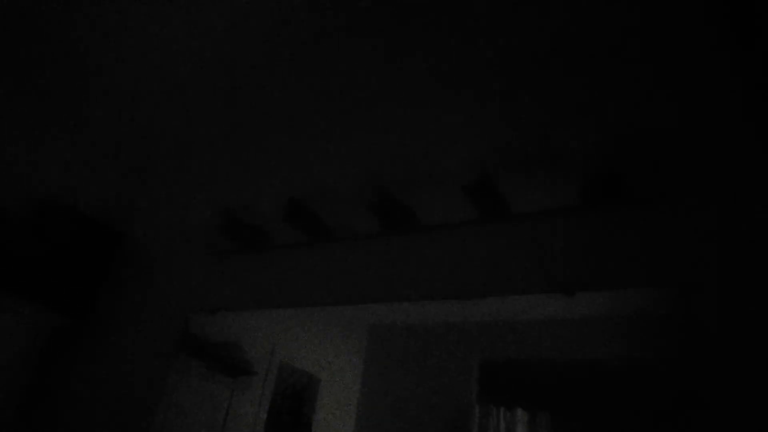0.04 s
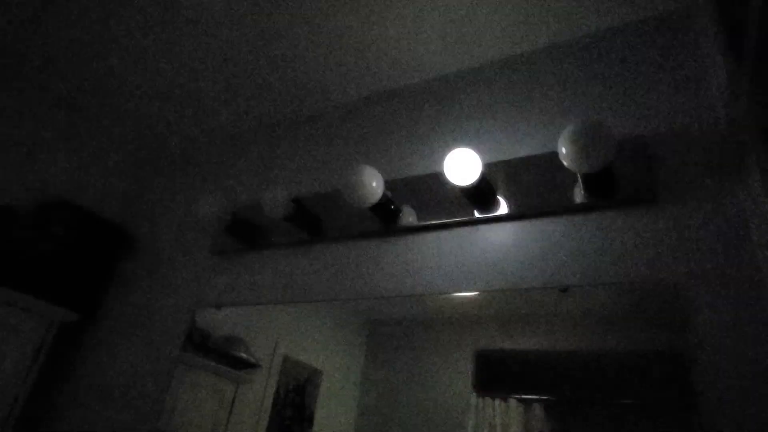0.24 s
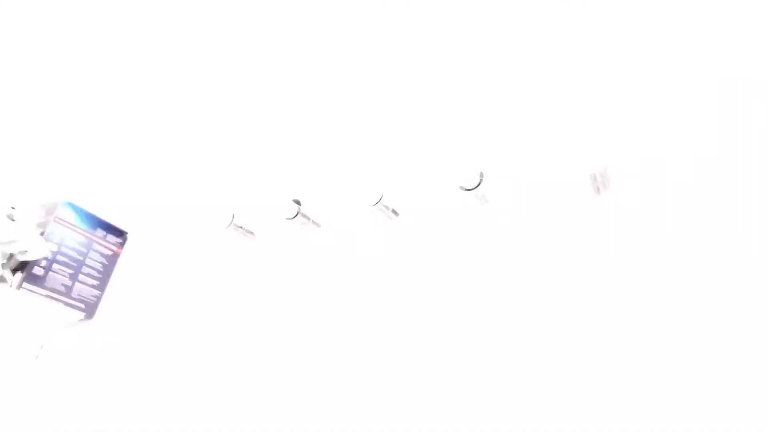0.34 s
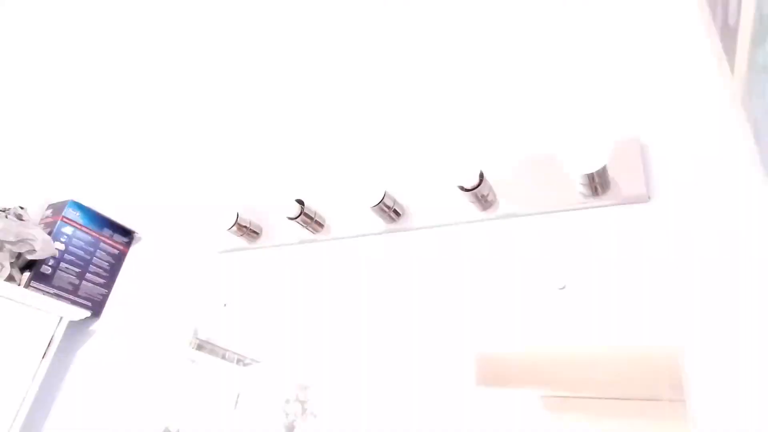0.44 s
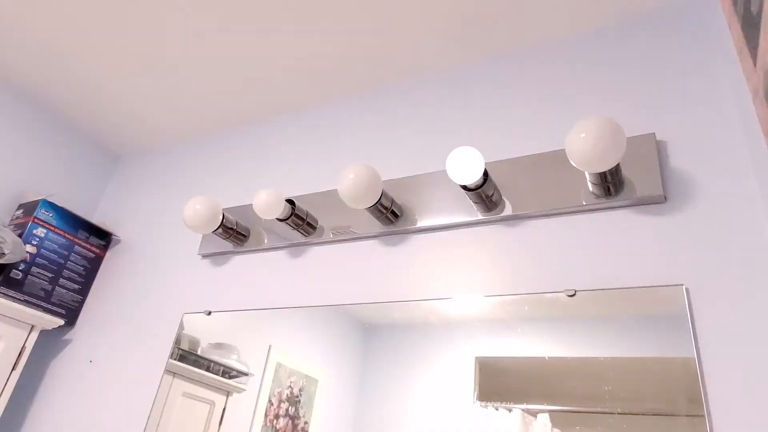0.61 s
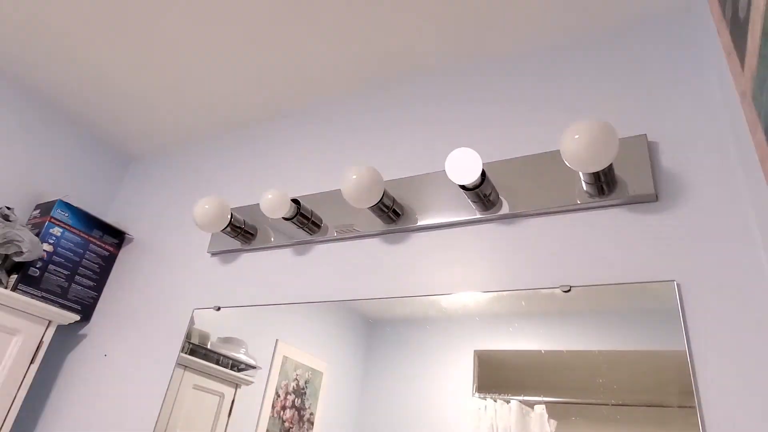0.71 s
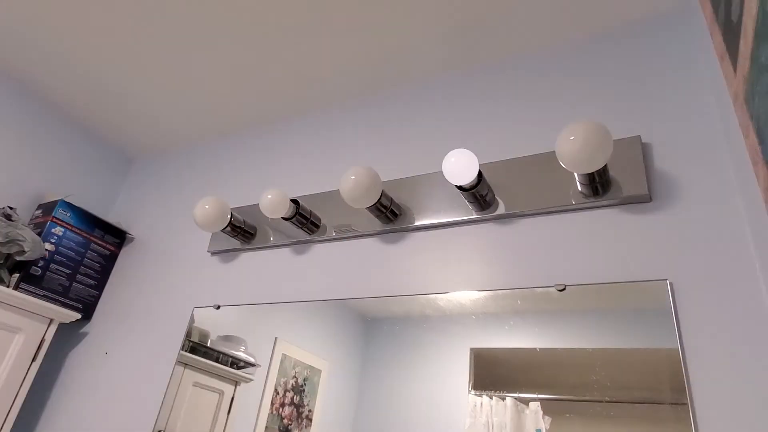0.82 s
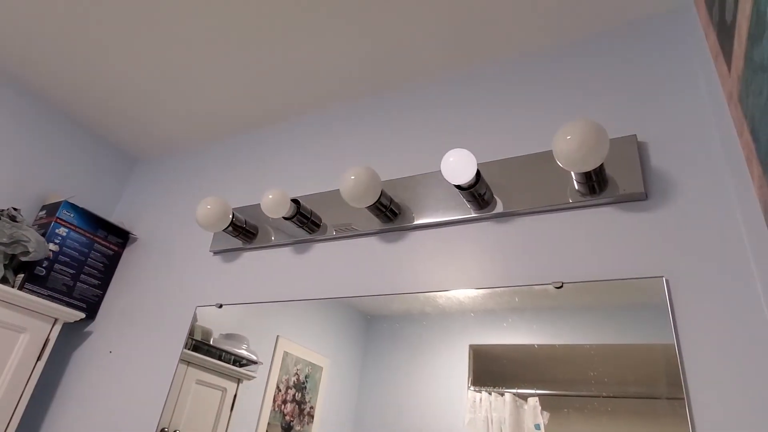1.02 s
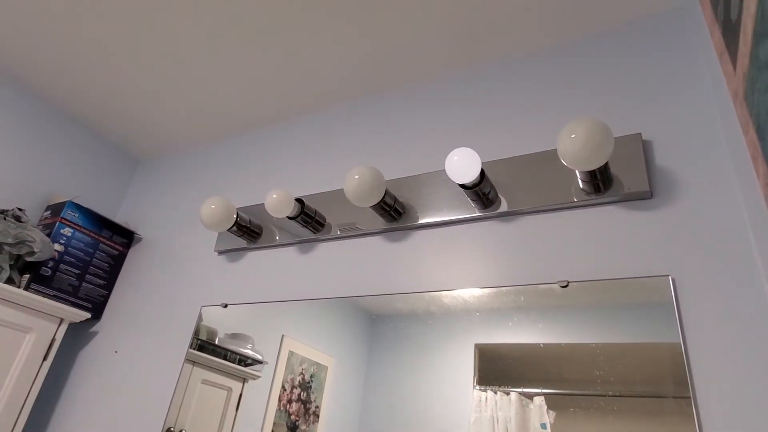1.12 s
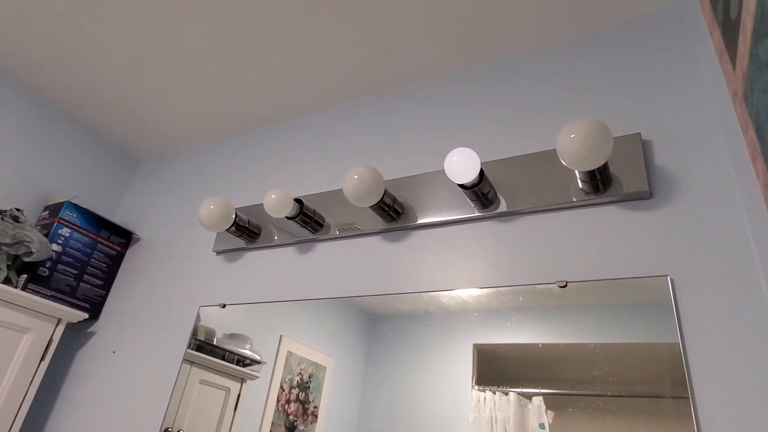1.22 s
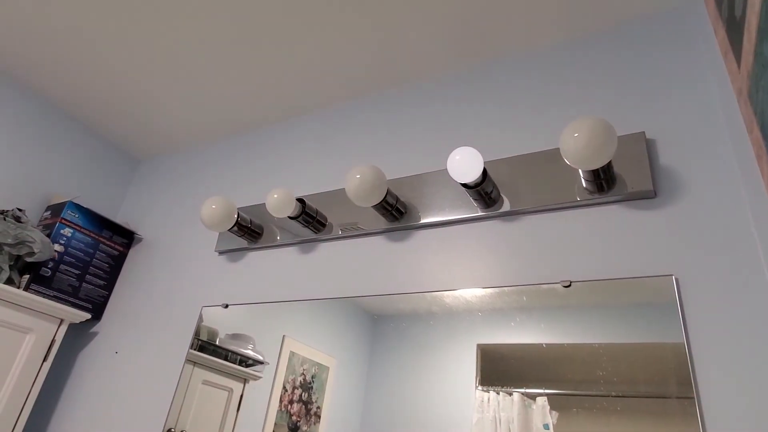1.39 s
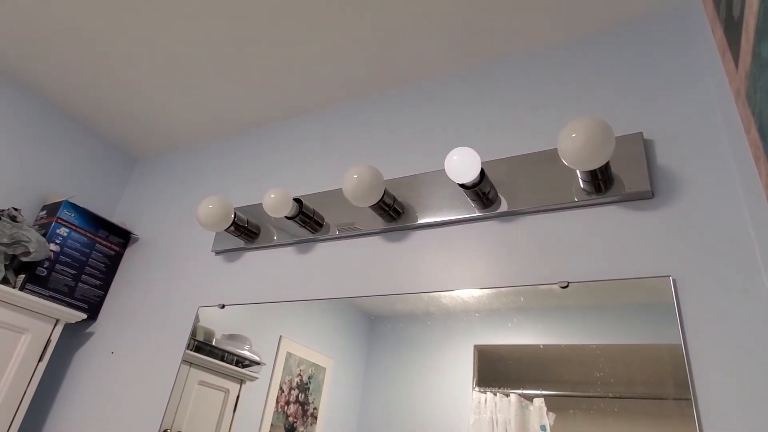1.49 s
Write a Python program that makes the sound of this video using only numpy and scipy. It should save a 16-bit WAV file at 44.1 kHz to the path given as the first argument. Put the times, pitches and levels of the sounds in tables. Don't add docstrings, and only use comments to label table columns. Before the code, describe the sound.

Single crisp light switch click with a hollow wall thump and short bathroom echo, over faint hum.

```python
import sys
import numpy as np
from scipy import signal
from scipy.fft import rfft, irfft
from scipy.io import wavfile

SR = 44100
rng = np.random.default_rng(int(sys.argv[2]) if len(sys.argv) > 2 else 0)


def voltage_ratio(level):
    return 10 ** (np.asarray(level, float) / 20)


def file_out(sig):
    cols = np.atleast_2d(sig).T
    lim = np.clip(cols, -1, 1)
    pcm = np.round(lim * 32767).astype(np.int16)
    wavfile.write(sys.argv[1], SR, pcm)


N = 68355
SNAP_S, SNAP_DB = .2361, -26


def evened(x):
    return x / np.sqrt(np.mean(x ** 2) + 1e-20)


def read(points, hz):
    f, value = np.transpose(points)
    return np.interp(np.log(hz + 1), np.log(f + 1), value)


def coloured(x, points):
    hz = np.fft.rfftfreq(x.shape[-1], 1 / SR)
    return irfft(rfft(x) * voltage_ratio(read(points, hz)), x.shape[-1])


def spread(pair, same, lean_db):
    right = same * pair[0] + np.sqrt(1 - same ** 2) * pair[1]
    return np.array([pair[0] * voltage_ratio(lean_db / 2), right * voltage_ratio(-lean_db / 2)])


def ring(start, db, modes, strikes=((0, 0),)):
    out = np.zeros((2, N))
    for delay, strike_db in strikes:
        t = np.maximum(np.arange(N) / SR - start - delay, 0)
        for hz, left_db, right_db, t60 in modes:
            fall = voltage_ratio(db + strike_db - 60 * t / t60)
            out += voltage_ratio([[left_db], [right_db]]) * fall * np.sin(2 * np.pi * hz * t)
    return out


def crack(start, db, t60, colour):
    rise_s = .0003
    t = np.arange(N) / SR - start
    burst = evened(coloured(rng.standard_normal((2, N)), colour))
    return burst * np.clip(t / rise_s, 0, 1) * voltage_ratio(db - 60 * abs(t) / t60)


def blow(start, db):
    return voltage_ratio(db) * (np.arange(N) == round(start * SR))


def snap():
    # delay after the snap in seconds, level in dB.
    bounces = [
        (0, -3.5),
        (.0012, -6),
        (.0026, -1.5),
        (.0065, -5),
    ]
    # pitch in Hz, left in dB, right in dB, time to fall 60 dB in seconds.
    plate = [(1750, -25.5, -11.5, .04), (1821, -10, -4, 0.075), (1980, -12, -4.5, 0.029),
             (2450, -15, -13, .02), (3215, -6.5, 4.5, .025), (4846, -11, -12.5, .09), (7110, -8, -16, .012),
             (9340, -10.5, -10, 0.025), (10915, -7.5, -13.5, 0.013)]
    # pitch in Hz, level in dB.
    contact_colour = [(300, -32), (1000, -9), (2000, -2.5), (3500, -0.5), (6000, 1.5), (8200, -6.5),
                      (10000, -4), (15000, -12.5)]
    # pitch in Hz, level in dB.
    room_colour = [(200, -3), (450, -1.5), (1000, -2), (2000, 0.5), (4000, -3), (7500, -7.5), (8200, -14.5),
                   (10000, -12), (15000, -19.5)]
    rings = ring(SNAP_S, SNAP_DB, plate, bounces)
    contact = crack(SNAP_S, SNAP_DB + 3, .014, contact_colour)
    sent = blow(SNAP_S, SNAP_DB) + voltage_ratio(-35) * rings.mean(0)
    return rings + contact + room(sent, 25.5, room_colour)


def slip():
    # pitch in Hz, left in dB, right in dB, time to fall 60 dB in seconds.
    lever = [(2715, -3.5, -12, 0.023), (6000, -1, -11.5, .01), (9460, -5.5, -10.5, 0.013)]
    # pitch in Hz, level in dB.
    scrape_colour = [(900, -28), (2000, -3), (3300, -1.5), (4200, -10), (6000, -2.5), (8000, -11.5),
                     (10000, -13.5), (12000, -27)]
    start, db = .2226, -50
    scrape = crack(start, db, .015, scrape_colour)
    return scrape + ring(start, db, lever) + room(blow(start, db), 20.5, scrape_colour)


def swelling(t, hz, db, t60, rise):
    return voltage_ratio(db - 60 * t / t60) * (1 - np.exp(-t / rise)) ** 2 * np.sin(2 * np.pi * hz * t)


def wall():
    # pitch in Hz, level in dB, time to fall 60 dB in seconds, rise in seconds.
    wall_modes = [(71, -50.5, 0.27, .04), (89, -37.5, .2, 0.017), (132, -38, 0.18, 0.0079),
                  (175, -44, .15, .006), (240, -39, 0.27, .008), (301.4, -43, 0.3, 0.0082),
                  (345, -27.5, .08, .004), (410, -50, 0.29, .03)]
    t = np.maximum(np.arange(N) / SR - SNAP_S, 0)
    boom = sum(swelling(t, *row) for row in wall_modes)
    panel = swelling(t, hz=382, db=-35, t60=.7, rise=.008)
    damp_s, damp_t60 = .072, .04
    return boom + panel * voltage_ratio(-60 * np.maximum(t - damp_s, 0) / damp_t60)


def knock():
    # start in seconds, level in dB.
    knocks = [
        (1.328, -62),
        (1.542, -71),
    ]
    # pitch in Hz, left in dB, right in dB, time to fall 60 dB in seconds.
    body = [(440, 1, 7, 0.022), (670, 0, -4, .025), (1160, -11, -10, 0.018)]
    # pitch in Hz, level in dB.
    echo_colour = [(200, 0.5), (600, 2), (1300, -11.5), (2000, -20.5), (4000, -54)]
    return sum(ring(*row, body) + room(blow(*row), 19.5, echo_colour) for row in knocks)


def room(x, wet_db, tone):
    # pitch in Hz, time to fall 60 dB in seconds.
    fade = [(100, 0.87), (400, 0.25), (1000, 0.24), (3000, 0.23), (8000, 0.2), (14000, 0.22)]
    # pitch in Hz, likeness from -1 to 1.
    likeness = [(200, 0.9), (500, .7), (1200, -.1), (3000, -0.22), (6000, -0.39), (10000, 0.3)]
    # pitch in Hz, left minus right in dB.
    side = [(250, 1.43), (1000, -6.5), (2500, -1.5), (5000, 1), (12000, 2)]
    low_hz, gap_s = 430, .006
    late_db, late_stretch = -28.5, 1.8

    taps = np.zeros((2, SR // 2))
    at = np.arange(0, SR // 2 - 20, 20) + rng.integers(0, 20, (2, (SR // 2 - 1) // 20))
    np.put_along_axis(taps, at, rng.choice([-1., 1.], at.shape), 1)

    hz, t, z = signal.stft(taps, SR, nperseg=256)
    same = np.clip(read(likeness, hz), -1, 1)[:, None]
    z = spread(z, same, read(side, hz)[:, None])
    fall_db = -60 * t / read(fade, hz)[:, None]
    z = z * voltage_ratio(read(tone, hz)[:, None]) * (voltage_ratio(fall_db) + voltage_ratio(late_db + fall_db / late_stretch))
    tail = signal.istft(z, SR, nperseg=256)[1]
    tail = tail * np.minimum(np.arange(tail.shape[1]) / SR / gap_s, 1) ** 2
    tail = signal.sosfilt(signal.butter(4, low_hz, "high", fs=SR, output="sos"), tail)
    tail = tail / np.linalg.norm(tail[0])
    return voltage_ratio(wet_db) * signal.fftconvolve(x[None], tail, axes=1)[:, :N]


def hum():
    # pitch in Hz, width in Hz, level in dB, steady share from 0 to 1.
    tones = [(59.6, 4, -65, .85), (91, 8, -79, 0.1), (117.2, 4, -73.5, .65), (213, 10, -80.5, 0.05),
             (332.4, 15, -73, .4)]
    # time in seconds, level in dB.
    swell_points = [(0.0, -66.5), (0.056, -71), (0.188, -62), (0.232, -72.5), (0.302, -49), (0.362, -62),
                    (0.6, -61), (0.672, -69), (0.738, -62.5), (0.836, -74), (1.182, -67), (1.23, -79),
                    (1.342, -63), (1.55, -69.5)]
    # pitch in Hz, level in dB per Hz.
    rumble = [(20, -10.5), (45, -2.5), (110, 3), (160, -5), (350, -9), (520, -16.5), (700, -29.5),
              (1500, -40.5)]
    hz, t = np.fft.rfftfreq(N, 1 / SR), np.arange(N) / SR
    out = voltage_ratio(-68.5) * evened(coloured(rng.standard_normal((2, N)), [*rumble, (4000, -84.5)]))
    swell = np.interp(t, *np.transpose(swell_points))
    for k, (f, width, db, steady) in enumerate(tones):
        narrow = 1 / (1 + (2 * (hz - f) / width) ** 2)
        fuzz = evened(irfft(rfft(rng.standard_normal((2, N))) * narrow, N))
        pure = np.sqrt(2) * np.sin(2 * np.pi * (f * t + rng.random((2, 1))))
        tone = evened(steady * pure + (1 - steady) * fuzz)
        out = out + voltage_ratio(db + (k == 0) * (swell - swell.mean())) * tone
    return spread(out, same=.9, lean_db=-4)


def hiss():
    # pitch in Hz, level in dB per Hz.
    hiss_colour = [(410, -41), (700, -6), (798, -3.5), (946, -8), (1250, -8.5), (3500, -12.5),
                   (7590, -21.5), (14800, -13), (16000, -13.5)]
    return voltage_ratio(-84.5 + 3.5) * evened(coloured(rng.standard_normal((2, N)), hiss_colour))


def scene():
    return slip() + snap() + wall() + knock() + hum() + hiss()


def band_limit(x):
    return signal.sosfilt(signal.butter(12, 16250, fs=SR, output="sos"), x)


def record(dry):
    cut = signal.sosfilt(signal.butter(3, 38, "high", fs=SR, output="sos"), dry)
    edge = signal.firwin(255, 16000, window=("kaiser", 9), fs=SR)
    return band_limit(signal.oaconvolve(cut, edge[None], "same"))


dry = scene()
out = record(dry)
file_out(out)
```